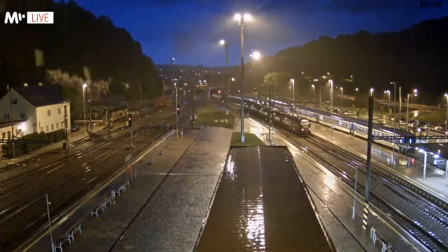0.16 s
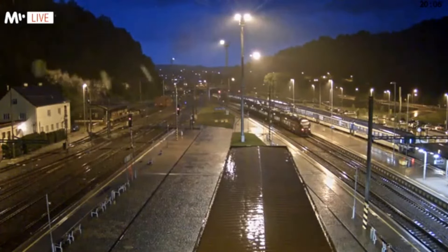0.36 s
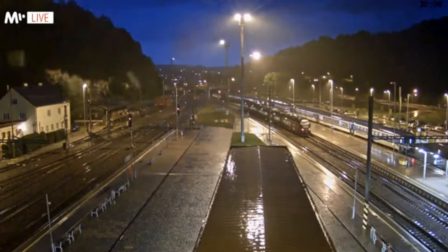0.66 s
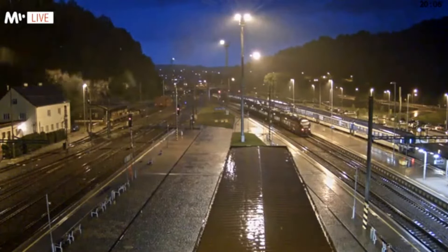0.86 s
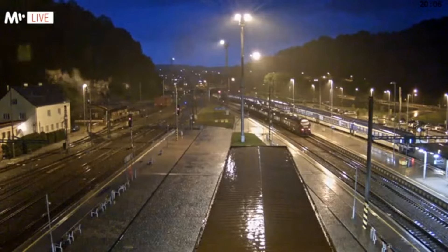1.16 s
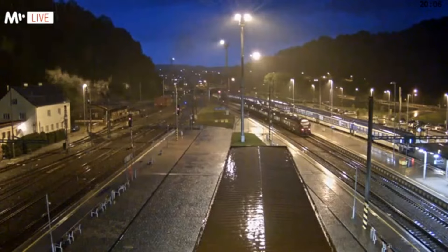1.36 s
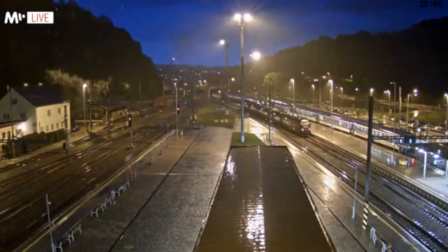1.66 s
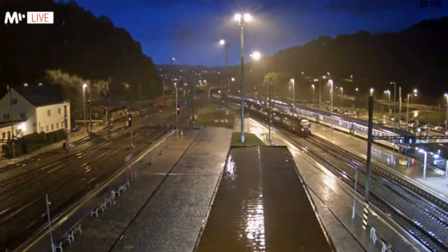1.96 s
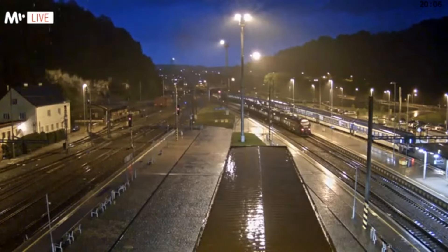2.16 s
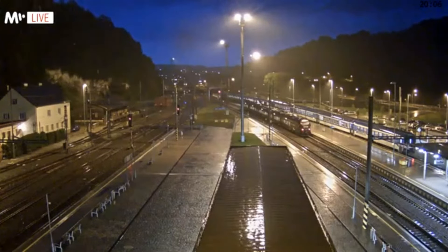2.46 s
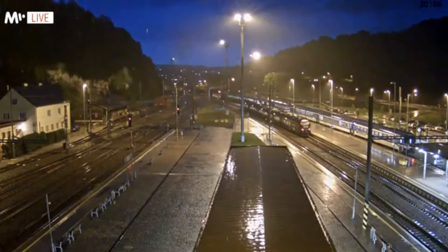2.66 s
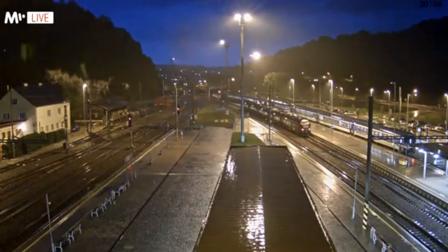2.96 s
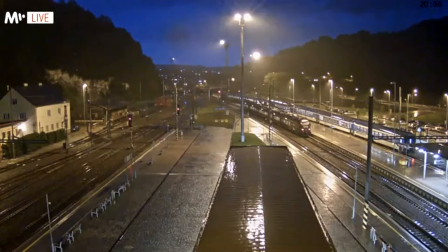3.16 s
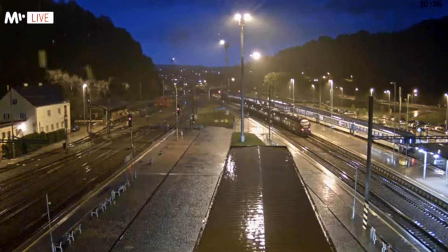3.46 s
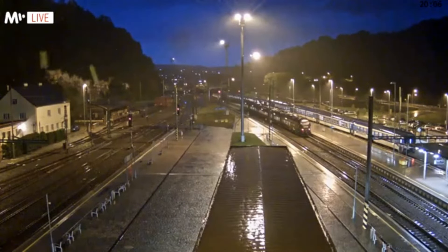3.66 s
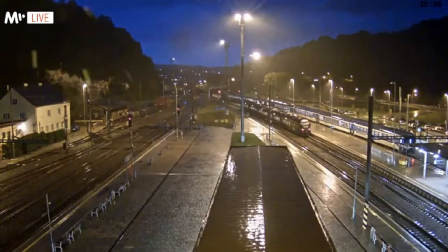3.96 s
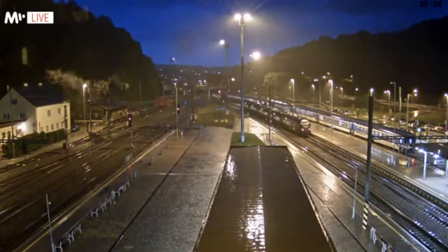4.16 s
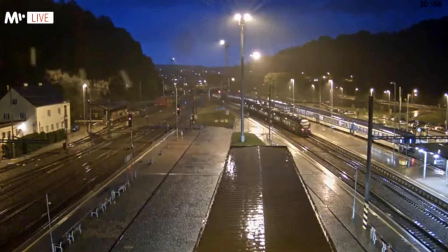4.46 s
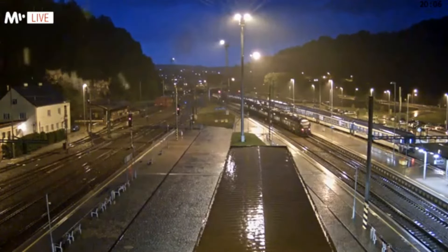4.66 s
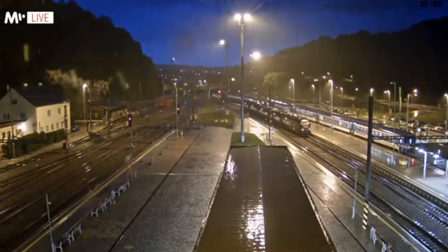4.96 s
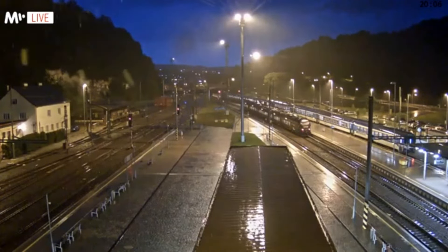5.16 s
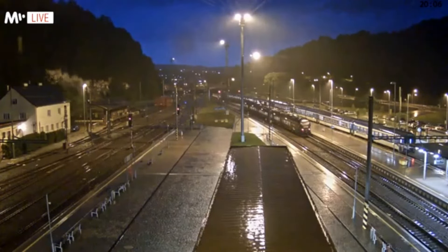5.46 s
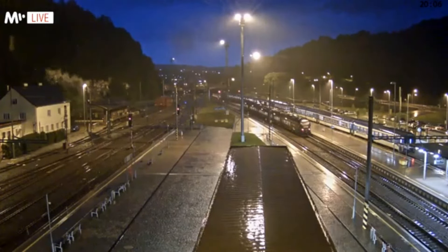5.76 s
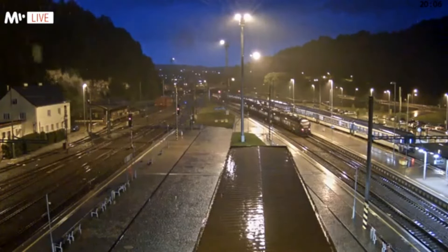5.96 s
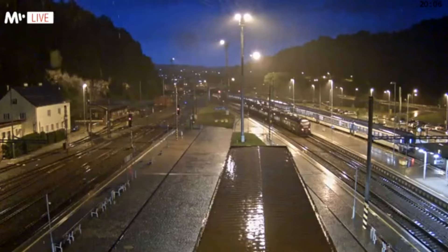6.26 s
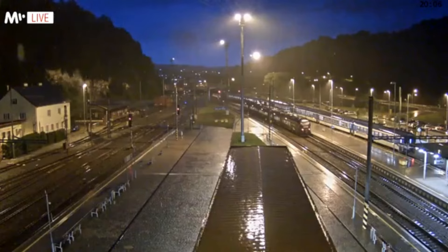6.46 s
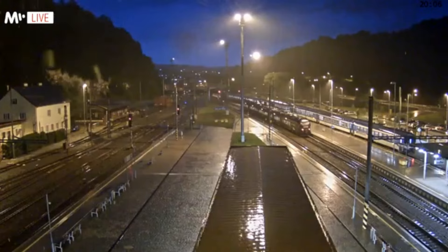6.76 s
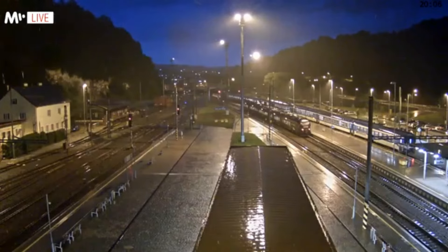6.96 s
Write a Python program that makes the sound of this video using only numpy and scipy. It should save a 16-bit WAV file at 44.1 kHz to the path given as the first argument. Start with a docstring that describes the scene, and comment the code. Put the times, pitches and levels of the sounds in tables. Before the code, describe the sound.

Deep thunder cracks and rolls twice over steady rain, with small drops ticking close by outdoors.

```python
"""Thunder over a rainy railway yard

Two rolls of thunder over steady rain, heard from a small outdoor camera microphone. Every kink of
the lightning channel sends its own pressure wave; hills and air smear them into a roll. Rain hisses
on gravel and roofs, drops tick and plink close by; the loudest waves overload the input."""
import sys
import numpy as np
from scipy import signal
from scipy.io import wavfile
from scipy.ndimage import uniform_filter1d, minimum_filter1d

SR = 44100
rng = np.random.default_rng(int(sys.argv[2]) if len(sys.argv) > 2 else 0)


def wav_out(sig):
    """Save sig, one row per channel (or a flat mono array), as 16-bit PCM at SR to the path in sys.argv[1]."""
    wavfile.write(sys.argv[1], SR, np.round(np.clip(np.atleast_2d(sig).T, -1, 1) * 32767).astype(np.int16))


N = 313110

# single heavy booms in the roll: t/s, level/dB, f/Hz, hold before dying/s
BOOMS = [(0.286, -23.5, 79, 0.029), (0.79, -15.5, 50.3, 0.021), (1.163, -11.5, 198, 0.042),
         (1.198, -14.5, 147, 0.038), (1.255, -7, 197, 0.014), (1.24, -7.5, 40.4, 0.024),
         (1.43, -1, 108, 0.013), (1.502, -4, 110.7, 0.038), (1.553, 4, 78.1, 0.012),
         (1.591, -3.5, 135.3, 0.05), (1.637, 8, 98, 0.012), (1.763, -2, 95, 0.012), (1.868, -7, 151, 0.021),
         (1.909, -6.5, 142, 0.017), (2.143, -3, 111, 0.013), (2.167, 3, 128, 0.01), (2.328, 0.5, 151, 0.03),
         (2.361, -3.5, 118.2, 0.079), (2.637, -7.5, 69.6, 0.044), (2.856, -7.5, 94, 0.02),
         (3.026, 1.5, 108, 0.0063), (3.063, -0.5, 103.4, 0.02), (3.098, -11, 102.6, 0.015),
         (3.252, -3, 95, 0.013), (3.528, -3.5, 73, 0.0073), (3.683, -9, 54.4, 0.02), (3.889, -11, 52, 0.03),
         (4.017, -11.5, 67, 0.021), (4.057, -4, 81, 0.016), (4.237, -11, 53.8, 0.014),
         (4.516, -10.5, 57, 0.016), (4.987, -10.5, 40.6, 0.026), (5.061, -20, 112, 0.033),
         (5.262, -5, 67, 0.059), (5.318, 0.5, 70, 0.017), (5.59, -2.5, 79.3, 0.058),
         (5.647, 7, 83.3, 0.012), (5.793, -7, 79, 0.042), (5.846, -3, 92, 0.027),
         (6.006, -4.5, 59.3, 0.017), (6.122, -5, 110, 0.024), (6.186, -9, 94, 0.0077),
         (6.214, 1.5, 109, 0.0067), (6.233, -5, 97, 0.013), (6.368, -20, 70, 0.0087),
         (6.419, -9, 114, 0.012), (6.668, -8, 57.2, 0.06), (6.843, -5.5, 63.3, 0.032),
         (6.888, -1.5, 48.7, 0.011)]
# cracks from near kinks: t/s, level/dB, lift/dB (the shorter waves each take a share of it)
CRACKS = [(0.165, -39, 14), (0.78, -23, 9), (0.803, -24, 2), (1.166, -25, 2), (1.46, -26, 3.5),
          (1.603, -28, 5), (2.325, -34, 7.5), (2.926, -22, -3), (3.0426, 2, 13), (3.226, -8, 2),
          (3.231, -12, -3), (3.279, -28, 1), (3.694, -28, 5), (4.227, -31, 5), (5.06, -34, 4),
          (5.25, -28, -2), (5.44, -23, 4.5), (5.611, -25, 6), (5.82, -22, -1), (6.895, -36, 9)]
ECHO_S = 0.0065  # a crack's echoes build up over this time


def gain_of(db):
    """Decibels to a factor."""
    return 10 ** (np.asarray(db) / 20)


def unit_rms(x):
    """Scales to rms 1."""
    return x / np.sqrt(np.mean(x ** 2) + 1e-20)


def curves(rows):
    """Every column after the time column, interpolated sample by sample."""
    times, *columns = np.transpose(rows)
    return [np.interp(np.arange(N) / SR, times, column) for column in columns]


def add(mix, s, sound):
    """Mixes a sound in at time s."""
    part = mix[max(round(s * SR), 0):][:len(sound)]
    part += sound[:len(part)]


def coloured(x, spectrum):
    """Causal filter with the given spectrum: the phase follows from the log gain."""
    size = 16384
    hz, db = np.transpose(spectrum)
    bin_hz = abs(np.fft.fftfreq(size, 1 / SR))
    log_gain = np.log(gain_of(np.interp(np.log(bin_hz + 1), np.log(hz + 1), db)))
    taps = np.fft.ifft(np.exp(np.conj(signal.hilbert(log_gain)))).real[:size // 2]
    return signal.oaconvolve(x, taps)[:len(x)]


def resonate(x, hz, width_hz):
    """A moving resonance: shifts the curve hz down to zero, smooths, and shifts back."""
    turn = np.exp(2j * np.pi * np.cumsum(hz) / SR)
    pole = np.exp(-np.pi * width_hz / SR)
    return 2 * (turn * signal.lfilter([1 - pole], [1, -pole], x / turn)).real


def low_pass(x, hz):
    """Steep band limit."""
    return signal.oaconvolve(x, signal.firwin(511, hz, window=("kaiser", 9), fs=SR)[None], "same")


def arrivals(per_s, spread_db):
    """Clicks of random sign and size at random moments."""
    chance, sign, size = rng.random(N), rng.choice([-1., 1.], N), rng.exponential(1, N)
    return (chance < per_s / SR) * sign * gain_of(spread_db * np.minimum(size, 4))


def decays(times, heights, tau_s):
    """Jumps at the given times that fade exponentially, summed."""
    jumps = np.zeros(N)
    np.add.at(jumps, (np.asarray(times) * SR).astype(int), heights)
    return signal.lfilter([1], [1, -np.exp(-1 / (tau_s * SR))], jumps)


def rings(rows, t60, rise_cycles, glide, rough):
    """Each row is a tone that rises, may hold, and dies; noise roughens its phase."""
    out, t = np.zeros(N), np.arange(SR // 4) / SR
    for s, db, hz, *hold in rows:
        turns = hz * t * (1 + glide * t / t60)
        wobble = unit_rms(uniform_filter1d(rng.standard_normal(len(t)), size=round(SR / hz)))
        attack = 1 - np.exp(-t * hz / rise_cycles)
        fall = gain_of(db - 60 * np.maximum(t - sum(hold), 0) / t60)
        add(out, s, attack * fall * np.sin(2 * np.pi * turns + rough * wobble))
    return out


def waves(level_db, spectrum, per_s, spread_db):
    """One size of pressure wave: random arrivals, wavering by 1 dB rms about a level curve."""
    span = round(0.06 * SR)
    waver_db = unit_rms(uniform_filter1d(uniform_filter1d(rng.standard_normal(N), span), span))
    return gain_of(level_db + waver_db) * unit_rms(coloured(arrivals(per_s, spread_db), spectrum))


def roll():
    """Long waves from the far channel over a deeper swell; their length drifts, and a share hums."""
    # long waves: t/s, level/dB, hum f/Hz
    long_track = [(0.0, -27, 61.7), (0.3, -31, 59.4), (0.45, -39, 58.2), (0.7, -31.5, 45.2),
                  (0.85, -27, 50.8), (1.0, -26.5, 59.6), (1.3, -21.5, 109.2), (1.55, -8, 114.3),
                  (1.85, -11.5, 79), (1.95, -12.5, 63), (2.08, -22, 63.4), (2.17, -6.5, 60),
                  (2.28, -20.5, 59.6), (2.37, -5.5, 58.7), (2.55, -12.5, 54.6), (2.7, -12.5, 79),
                  (2.93, -22.5, 82.4), (3.08, -9.5, 88), (3.4, -24, 75.4), (3.75, -21.5, 55.4),
                  (4.05, -22.5, 55), (4.35, -25.5, 59.5), (4.45, -28, 71), (4.55, -23, 70.4),
                  (4.67, -35, 80.2), (4.78, -21, 90.3), (4.9, -36, 92), (5.1, -17.5, 77),
                  (5.2, -24.5, 79.2), (5.3, -16, 75.8), (5.55, -15.5, 77), (5.62, -12.5, 81),
                  (5.75, -15.5, 78.4), (5.85, -12.5, 84), (5.97, -20.5, 80), (6.15, -13, 90),
                  (6.27, -12, 79), (6.33, -16.5, 79), (6.45, -16, 70.4), (6.63, -24, 58.6),
                  (6.72, -16.5, 58.4), (6.76, -17, 60), (6.82, -16, 60.2), (6.92, -25, 56.3),
                  (6.97, -25, 50.3), (7.1, -29.5, 55.2)]
    # deepest swell: t/s, level/dB
    swell_track = [(0.0, -26), (0.5, -35.5), (0.92, -34), (1.05, -27.5), (1.5, -15.5), (2.3, -18),
                   (2.8, -19.5), (3.1, -22), (4.0, -26), (4.65, -24.5), (5.0, -21), (5.8, -35),
                   (6.02, -16.5), (6.4, -31), (6.7, -22.5), (7.1, -23.5)]
    # spectra of the two: f/Hz, level/dB
    long_spectrum = [(25, -53.5), (45, 1), (80, 4.5), (135, -1.5), (180, -15), (400, -76.5)]
    swell_spectrum = [(10, -20.5), (22, 7), (40, 5), (60, -4.5), (120, -64)]
    long_db, hum_hz = curves(long_track)
    swell_db, = curves(swell_track)
    long = unit_rms(coloured(arrivals(per_s=400, spread_db=0.46), long_spectrum))
    swell = unit_rms(coloured(arrivals(per_s=270, spread_db=3.0), swell_spectrum))
    hum = unit_rms(resonate(long, hum_hz, width_hz=38))
    return gain_of(long_db) * unit_rms(1.6 * long + hum) + gain_of(swell_db) * swell


def hollow(short):
    """The short waves, with a part of them ringing on in a narrow, drifting band."""
    # hollow ring: t/s, gain/dB, f/Hz
    ring_track = [(0.0, -12, 583), (1.5, -14, 608), (2.6, -4, 614), (2.8, -11, 636), (2.9, 11.5, 606),
                  (2.98, 4, 574), (3.05, -6, 596), (3.16, -0.5, 640), (3.22, 3.5, 610), (3.29, 8.5, 630),
                  (3.4, -5, 676), (3.72, -8, 586), (4.25, -6.5, 624), (4.6, -8, 654), (5.2, -1, 569),
                  (7.1, -7, 588)]
    db, hz = curves(ring_track)
    return short + gain_of(db) * resonate(resonate(short, hz, width_hz=100), hz, width_hz=390)


def peal():
    """Ever shorter waves: booms drag middle ones along, cracks lift the rest, distance dulls the top."""
    # body of the peal: t/s, middle level/dB, upper level/dB
    body_track = [(0.0, -31, -32), (0.12, -35, -36.5), (0.2, -33, -34.5), (0.36, -37, -36),
                  (0.5, -40.5, -35), (0.58, -38, -41), (0.69, -35, -43), (0.77, -33, -34),
                  (0.81, -24, -23.5), (0.9, -24, -32), (0.94, -34.5, -34.5), (1.05, -29.5, -33.5),
                  (1.15, -23, -36), (1.165, -22, -25), (1.27, -15, -26.5), (1.32, -14.5, -18),
                  (1.62, -6.5, -17), (1.8, -14, -18), (1.88, -12, -21), (1.94, -8.5, -18),
                  (2.0, -14.5, -17.5), (2.08, -22, -23), (2.16, -5.5, -31), (2.22, -12, -25),
                  (2.31, -19, -14.5), (2.33, -12, -9.5), (2.59, -16.5, -22.5), (2.98, -20, -21.5),
                  (3.04, -13.5, -19), (3.07, -6, -13.5), (3.11, -22, -19), (3.2, -19.5, -25.5),
                  (3.3, -23, -19), (3.41, -31, -34.5), (3.51, -24, -25.5), (3.65, -32, -37),
                  (3.74, -17.5, -26), (3.85, -31.5, -34), (4.05, -25, -37), (4.19, -34.5, -34.5),
                  (4.26, -25, -35.5), (4.36, -34, -35.5), (4.55, -28, -36), (4.69, -36.5, -39),
                  (4.92, -30, -37), (5.04, -30, -34.5), (5.07, -20, -29.5), (5.13, -26, -30),
                  (5.2, -27.5, -32.5), (5.28, -18.5, -23), (5.56, -19.5, -27), (5.6, -25, -21.5),
                  (5.7, -10.5, -22.5), (5.76, -22, -25), (5.83, -17, -22.5), (5.93, -21, -34),
                  (6.11, -18.5, -25), (6.55, -28, -38.5), (6.84, -26, -33.5), (7.06, -28.5, -51),
                  (7.1, -45, -31)]
    # short, knocking waves: t/s, level/dB
    knock_track = [(0.0, -39), (0.36, -43), (0.5, -38.5), (0.58, -40.5), (0.76, -44.5), (0.83, -35),
                   (1.145, -40), (1.17, -26), (1.44, -24.5), (1.47, -20), (1.64, -19), (1.8, -21),
                   (1.92, -21), (2.08, -22.5), (2.17, -19), (2.3, -22), (2.37, -20.5), (2.61, -22.5),
                   (2.83, -27), (2.9, -23), (3.0, -26.5), (3.07, -23.5), (3.22, -25.5), (3.29, -27),
                   (3.35, -30.5), (3.64, -33), (3.74, -29.5), (3.85, -32), (4.05, -31), (4.17, -35.5),
                   (4.25, -30), (4.4, -34), (4.5, -35.5), (4.94, -41), (5.12, -34.5), (5.24, -35.5),
                   (5.3, -24), (5.37, -32), (5.46, -25), (5.58, -32), (5.61, -22), (5.7, -25.5),
                   (5.73, -27), (5.77, -25), (5.89, -26), (5.99, -30.5), (6.15, -34.5), (6.2, -37),
                   (6.32, -32.5), (6.39, -38.5), (6.44, -33.5), (6.49, -39.5), (7.1, -47.5)]
    # crackle lost in the air as the part of the channel heard lies farther off: t/s, loss/dB
    air_loss = [(0.0, -2), (1.1, -1.5), (1.17, 2), (1.43, 0.5), (1.48, -0.5), (1.56, -0.5), (1.64, -2),
                (1.74, -0.5), (1.85, 0.5), (2.2, 0.5), (2.31, 4.5), (2.36, -2.5), (2.44, 0), (2.5, 2),
                (2.57, -0.5), (2.75, 0.5), (2.9, 0), (3.1, 0), (3.6, -0.5), (4.5, 3), (5.3, 1), (5.6, 5),
                (5.75, 3), (5.9, 3), (6.3, 10), (7.1, 8)]
    # spectra of the five sizes of wave, longest first: f/Hz, level/dB
    middle_spectrum = [(70, -39), (135, -5.5), (245, -15.5), (320, -21.5), (800, -74.5)]
    upper_spectrum = [(140, -37), (245, 3), (410, -2), (540, -31), (1200, -63)]
    short_spectrum = [(220, -28), (400, -1.5), (620, -4.5), (850, -7), (1200, -39), (2500, -67.5)]
    crackle_spectrum = [(500, -45), (900, -1), (1600, -8.5), (2400, -31), (5000, -44), (8000, -55.5)]
    tear_spectrum = [(1000, -37.5), (1700, -1.5), (2400, -7.5), (3200, -15.5), (5000, -30.5), (8000, -65)]
    middle_db, upper_db = curves(body_track)
    short_db, = curves(knock_track)
    loss_db, = curves(air_loss)
    boom_s, boom_db, *_ = np.transpose(BOOMS)
    wake = decays(boom_s, gain_of(boom_db - 18.5), tau_s=0.11 / np.log(1000))
    middle_db = 10 * np.log10(gain_of(2 * middle_db) + wake ** 2)  # powers add
    crack_s, _, crack_lift_db = np.transpose(CRACKS)
    lift_db = decays(crack_s + ECHO_S, crack_lift_db, tau_s=0.034)
    crackle_db = short_db - 7.5 + 0.19 * lift_db - loss_db
    tear_db = short_db - 18 + 0.76 * lift_db - 1.96 * loss_db
    return (waves(middle_db, middle_spectrum, per_s=700, spread_db=2.5)
            + waves(upper_db + 0.53 * lift_db, upper_spectrum, per_s=1400, spread_db=3.0)
            + hollow(waves(short_db + 0.26 * lift_db, short_spectrum, per_s=1500, spread_db=-0.46))
            + waves(crackle_db, crackle_spectrum, per_s=3000, spread_db=0.0)
            + waves(tear_db, tear_spectrum, per_s=3000, spread_db=2.0))


def hiss():
    """Countless drops far across the yard merge into noise with drifting patches and a shared flicker."""
    # rain on gravel and roofs: f/Hz, level/dB
    rain_spectrum = [(100, -10.5), (400, -4.5), (1200, -0.5), (2800, -7.5), (4500, -10), (6300, -13.5),
                     (9000, -13.5)]
    frames = N // 64 + 5
    real, imag, patches = rng.standard_normal((frames, 129, 3)).T
    patches = unit_rms(uniform_filter1d(uniform_filter1d(patches, size=6, axis=0), size=30, axis=1))
    flicker = unit_rms(uniform_filter1d(rng.standard_normal(frames), size=20))
    spectra = (real + 1j * imag) * gain_of(1.57 * patches + 0.5 * flicker)
    noise = signal.istft(spectra, nperseg=256, noverlap=192)[1][:N]
    return gain_of(-38) * unit_rms(coloured(noise, rain_spectrum))


def patter():
    """Nearer drops, each a short plink of its own pitch that glides up."""
    impacts = arrivals(per_s=330, spread_db=4.6)
    pitch_index = rng.integers(0, 30, N)
    out, t = np.zeros(N), np.arange(1500) / SR
    for k, hz in enumerate(np.geomspace(1900, 6800, num=30)):
        decay_cycles = rng.uniform(2.3, 7.5)
        envelope = np.exp(-t * hz / decay_cycles) * (1 - np.exp(-t * hz / 2.0))
        plink = np.sin(2 * np.pi * hz * t * (1 + 7.5 * t)) * envelope * (2000 / hz) ** 0.4
        out += signal.oaconvolve(impacts * (pitch_index == k), plink)[:N]
    return gain_of(-50.5) * unit_rms(out)


def splats():
    """Large drops burst on hard ground into a toneless spray: a sudden start and a short tail."""
    # spray: f/Hz, level/dB
    spray_spectrum = [(900, -29.5), (2000, 0.5), (4000, -2), (6500, -10.5), (9000, -11.5)]
    impacts = abs(arrivals(per_s=55, spread_db=3.3))
    bursts = decays(np.arange(N) / SR, impacts, tau_s=0.057 / np.log(1000))
    return gain_of(-49.5) * unit_rms(coloured(bursts * rng.standard_normal(N), spray_spectrum))


def near_drops():
    """Single drops close to the microphone stand out as rough, slightly rising ticks."""
    # close drops: t/s, level/dB, f/Hz
    drops = [(0.0164, -30, 3380), (0.3506, -26, 2340), (0.4023, -31, 2830), (0.5322, -27, 2920),
             (0.5536, -29, 3770), (0.7047, -24, 2370), (1.0124, -27, 2180), (2.7821, -23.5, 2850),
             (2.9325, -22.5, 2760), (3.4126, -28, 3300), (3.5104, -25, 2450), (3.5423, -30, 2770),
             (3.5867, -26, 3280), (3.8787, -23.5, 2330), (3.93, -26, 2350), (4.4412, -25, 2640),
             (4.4767, -24, 2330), (4.6134, -25.5, 2830), (4.624, -32, 4630), (4.6876, -27, 2330),
             (4.7537, -29, 2800), (4.759, -30, 3300), (4.9634, -27, 4640), (5.028, -27, 2700),
             (5.1501, -25, 3360), (5.5383, -29, 2910), (5.9284, -34, 2050), (6.0473, -23.5, 2370),
             (6.546, -22.5, 2290)]
    return rings(drops, t60=0.021, rise_cycles=1.8, glide=0.1, rough=0.8)


def cracks():
    """A near kink sends a push and a pull of air; ground and roofs scatter its echoes."""
    crack_hz, width_s = 1000, 0.0003
    pulse_t = (np.arange(88) - 44) / SR
    rounding = np.exp(-0.5 * (pulse_t / width_s) ** 2)  # the air softens the edges
    pulse = -np.sin(2 * np.pi * crack_hz * pulse_t) * rounding
    out, t = np.zeros(N), np.arange(SR // 5) / SR
    echo_envelope = 0.45 * gain_of(-60 * t / 0.048) * np.clip(t / ECHO_S, 0, 1) ** 2
    for s, db, _ in CRACKS:
        paths = echo_envelope * rng.standard_normal(len(t)) * (rng.random(len(t)) < 0.03)
        paths[0] = 1  # direct sound
        add(out, s, gain_of(db) * signal.oaconvolve(paths, pulse))
    return out


def booms():
    """Single heavy waves stand out of the roll, each a few low cycles long."""
    return rings(BOOMS, t60=0.05, rise_cycles=0.57, glide=-0.000055, rough=0.11)


def scene():
    """Thunder and rain as they reach one microphone in the yard."""
    return (booms() + near_drops() + roll() + peal() + cracks() + hiss() + patter() + splats())[None]


def record(dry):
    """The camera's input: a quick limiter, treble loss and a band limit; overshoots are cut flat."""
    # treble loss of the microphone path: f/Hz, gain/dB
    microphone_response = [(5500, -0.5), (6400, -3.5), (7000, -9.5), (7400, -19), (7800, -28), (8500, -47)]
    ceiling, span = 1.03, 221  # the limiter acts over 5 ms
    allowed_gain = np.minimum(ceiling / (abs(dry) + 1e-9), 1)
    held_gain = minimum_filter1d(allowed_gain, size=span, axis=1)
    limited = dry * uniform_filter1d(held_gain, size=span, axis=1)
    dulled = low_pass(coloured(limited[0], microphone_response)[None], hz=7870)
    return low_pass(np.clip(dulled, -1, 1), hz=15700)


dry = scene()
out = record(dry)
wav_out(out)
```